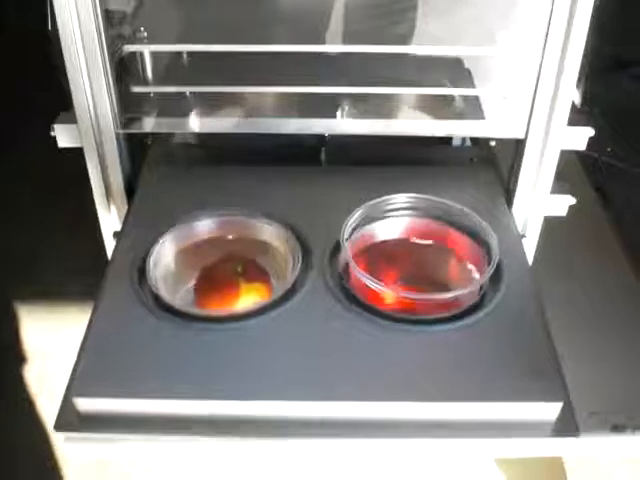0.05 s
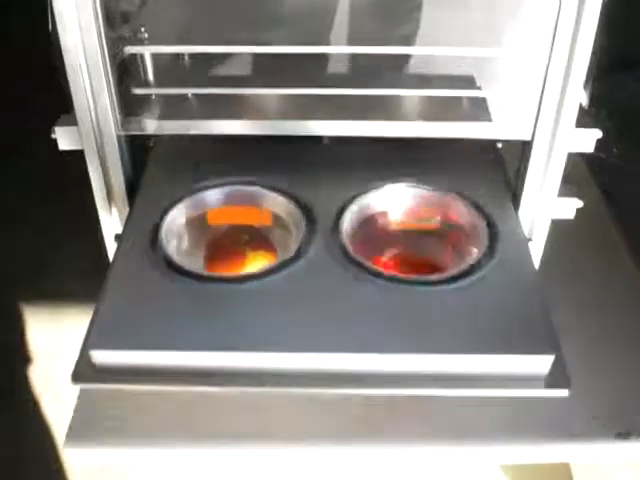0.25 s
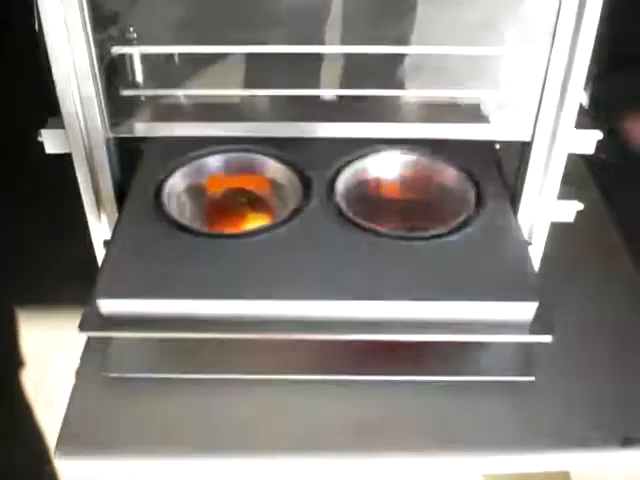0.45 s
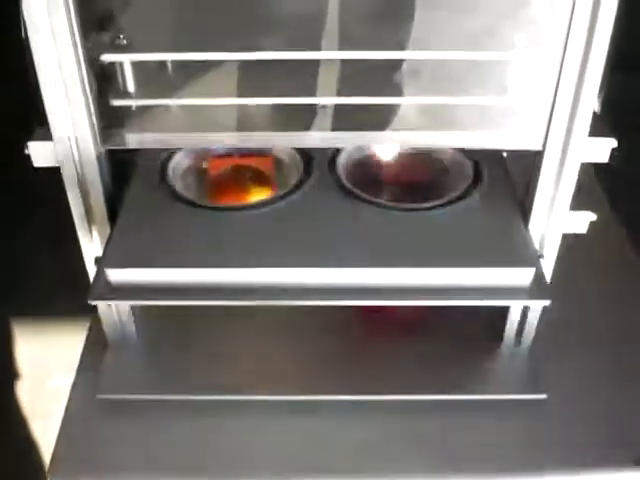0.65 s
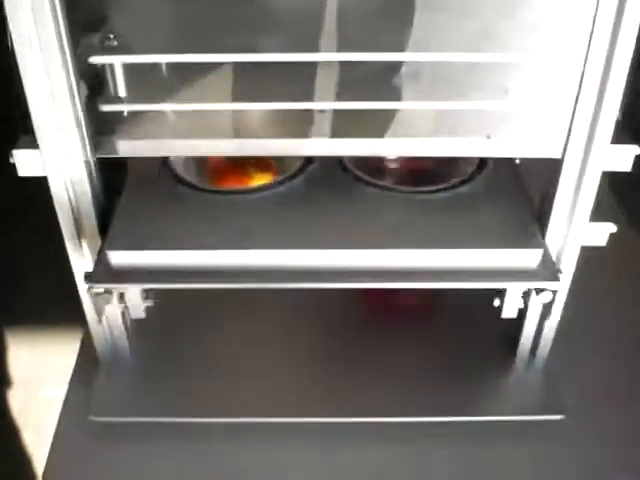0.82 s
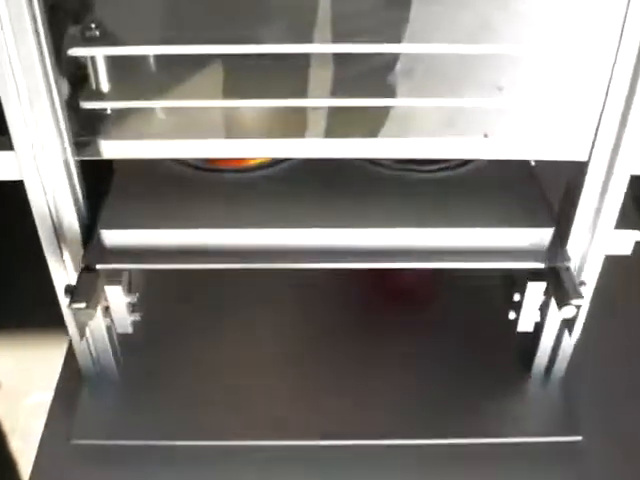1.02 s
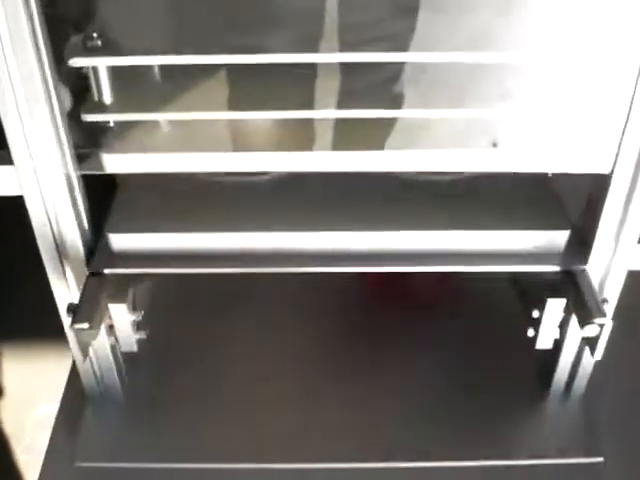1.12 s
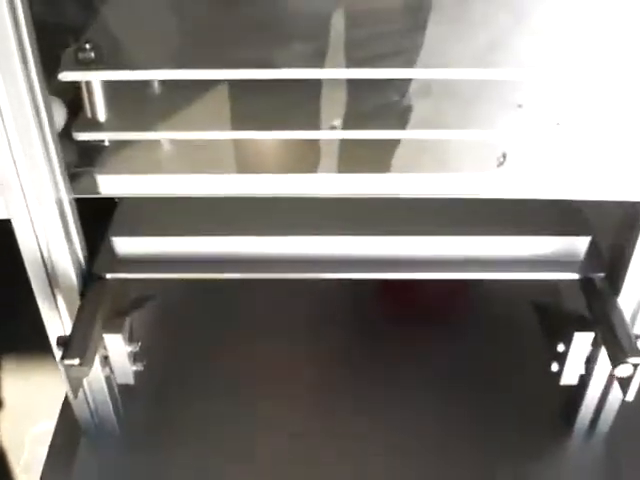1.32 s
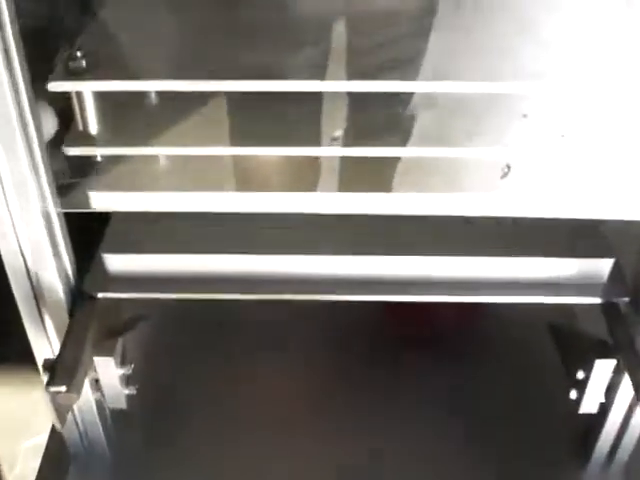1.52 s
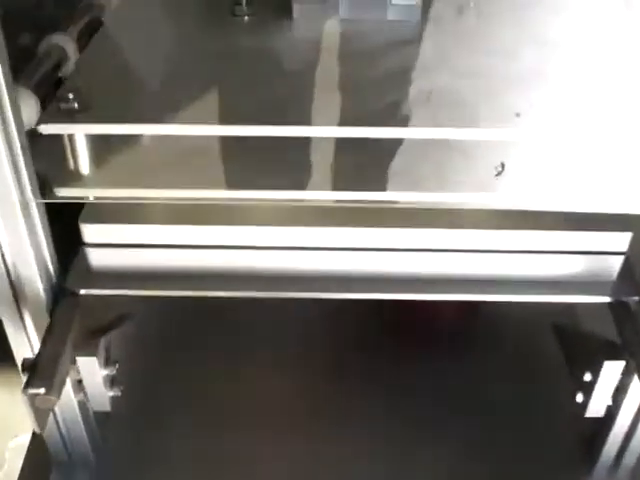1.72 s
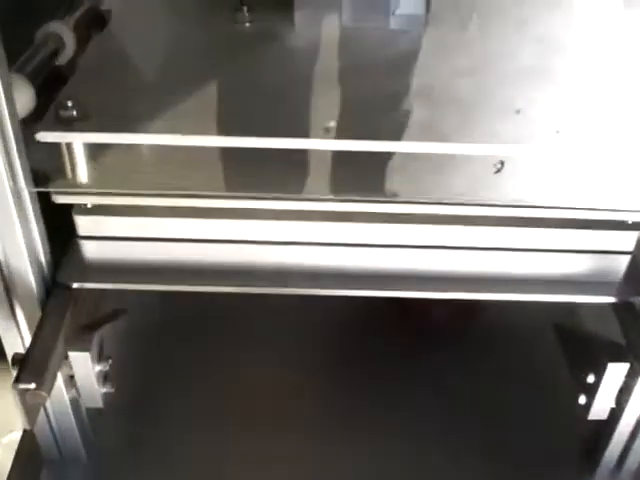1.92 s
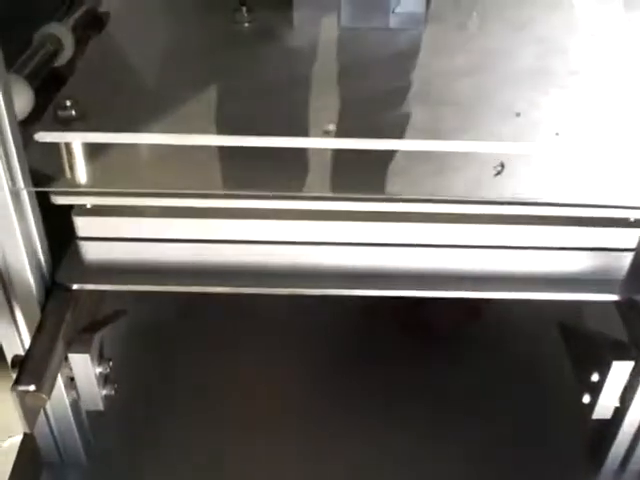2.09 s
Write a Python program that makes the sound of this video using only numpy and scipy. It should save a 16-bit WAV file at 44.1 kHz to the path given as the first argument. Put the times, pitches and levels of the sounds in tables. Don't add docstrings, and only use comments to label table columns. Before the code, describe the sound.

A pneumatic cup sealing machine, close, in a small workshop with faint hum. Near silence until 0.2 s, when a metal tray clatters sharply until 0.35, then rolls in, rumbling and squeaking, slowing by 1.0. A faint airy whistle and leak grow. At 1.35-1.45 switch clicks, a hard snap and a low thump. At 1.55 a bright air burst hisses, drops with small knocks at 1.75, dulls and fades by 2.1.

```python
import sys
import numpy as np
from scipy import signal
from scipy.fft import rfft, irfft, next_fast_len
from scipy.io import wavfile

SR = 44100
rng = np.random.default_rng(int(sys.argv[2]) if len(sys.argv) > 2 else 0)


def volts_from_decibels(level):
    exponent = np.asarray(level, float) / 20
    return 10 ** exponent


def transcribe(signal):
    frames = np.atleast_2d(signal).T
    limited = np.clip(frames, -1, 1)
    pcm = np.round(limited * 32767).astype(np.int16)
    wavfile.write(sys.argv[1], SR, pcm)


N = 94815

# frequency [Hz], level [dB per Hz].
FLOOR_COLOUR = [(50, -26), (80, -0.5), (140, 3), (217, -5), (600, -9), (1540, -28), (3180, -22),
                (12000, -32)]
FLOOR_DB, HUM_HZ, HUM_WIDTH_HZ, HUM_DB = -46, 166, 154, -45.5

# start [s], length
# [s], level [dB], first pitch [Hz], last pitch [Hz].
SQUEAKS = [(0.17, 0.32, -38, 172, 172), (.19, .07, -38, 520, 650), (0.52, 0.07, -46, 2450, 2520),
           (.21, 0.026, -39, 3900, 4000), (0.238, 0.009, -43, 4000, 4000), (0.43, 0.042, -39.5, 3280, 3040),
           (0.425, 0.065, -48, 4800, 5000), (0.44, .08, -42, 2560, 2440), (0.49, 0.03, -51, 5300, 5400),
           (.54, .05, -53, 6700, 6400), (.465, .025, -46, 1550, 1550), (0.41, 0.1, -40, 620, 600),
           (0.66, 0.31, -50, 2500, 2400), (0.66, 0.36, -46, 600, 540), (1.396, 0.2, -45, 1150, 1120),
           (1.47, .08, -35, 165, 163), (1.495, .02, -46, 2000, 2100), (1.48, .055, -49, 3100, 2900),
           (1.49, .03, -52, 3700, 3700), (1.775, .055, -40, 540, 550), (1.787, 0.08, -48, 1180, 1100),
           (1.873, .05, -43, 1230, 1200), (1.925, .065, -45, 1060, 1100), (2.0, .035, -51, 1150, 1150),
           (1.86, .065, -41, 170, 165), (.405, .025, -36, 190, 200)]
SQUEAK_SHARPNESS, SQUEAK_STEADY = 32, .9

# time [s], level [dB].
ROLL_LEVEL = [
    (.195, -38),
    (.25, -35),
    (.36, -41),
    (.45, -34),
    (.53, -39.5),
    (.7, -44.5),
    (.85, -48.5),
    (1.0, -55.5),
    (1.39, -55),
]
# frequency [Hz], level [dB per Hz].
ROLL_COLOUR = [(250, -7), (590, 1), (900, -5), (2490, -11.5), (3740, -18.5), (5090, -20), (8000, -31),
               (12000, -32)]
GRAINS_PER_S, GRAIN_SHARE = 1200, 0.78

# time [s], level [dB].
JOLTS = [(.1960, -37), (.2120, -28), (.2190, -33), (.2290, -29), (.2590, -23.5), (.2640, -12), (.2680, -7),
         (.2738, -4.5), (.2770, -12), (.2878, -17), (.2918, -9.5), (.2965, -10.5), (.2995, -14.5),
         (.3050, -32), (.3140, -17), (.3200, -18.5), (.3270, -32), (.3340, -40), (.3450, -26.5)]
# frequency [Hz], level [dB], 60 dB decay [s].
TRAY_MODES = [(526, -0.5, 0.054), (644, -5.5, 0.042), (720, -5.5, 0.1), (1016, -8.5, 0.053),
              (1205, -4, 0.035), (1406, -8, 0.059), (1587, -9.5, 0.026), (1920, -3, 0.024),
              (2166, -1, 0.019), (2600, -32, 0.022), (3240, -6, 0.011)]
# frequency [Hz], level [dB per Hz].
TRAY_CRACK = [(250, -10), (600, 0), (2200, -9), (4000, -14.5), (7500, -22), (12000, -29)]
TRAY_DB, TRAY_CRACK_DB, TRAY_CRACK_T60_S = -13.5, -4, 0.022
CRACK_RISE_S = 0.00066

# time [s], level [dB].
TICKS = [(.2185, -38.5), (.449, -42), (.5524, -46), (1.1161, -41.5), (1.148, -40.5), (1.177, -49),
         (1.425, -31), (1.439, -37), (1.497, -50), (1.512, -46), (1.5488, -20.5), (1.5555, -20),
         (1.7385, -31), (1.754, -32.5), (1.766, -34.5), (1.875, -32), (1.884, -50), (2.046, -50),
         (2.062, -44)]
# frequency [Hz], level [dB per Hz].
TICK_CRACK = [(900, -10), (1300, -1.5), (2100, 4), (3200, -3.5), (5000, -11.5), (7000, -17.5), (11000, -12)]
TICK_T60_S = 0.043

# time [s], level [dB], pitch [Hz], 60 dB decay [s].
KNOCKS = [(0.219, -27.5, 3950, 0.037), (.45, -35.5, 2030, 0.064), (.553, -40, 2550, 0.029),
          (.688, -35, 181, 0.11), (.955, -35, 1000, 0.036), (1.086, -38, 1020, 0.032),
          (1.121, -39, 1548, 0.028), (1.176, -38, 1020, 0.04), (1.388, -26, 2860, 0.03),
          (1.3935, -15, 2900, 0.035), (1.398, -23, 3170, 0.11), (1.401, -28, 555, .1),
          (1.456, -26, 164, 0.6), (1.554, -19.5, 492, 0.027), (1.735, -32, 950, 0.025),
          (1.739, -31, 820, 0.03), (1.744, -29, 690, 0.045), (1.752, -31, 1142, 0.038),
          (1.757, -33, 620, .04), (1.757, -34, 400, .04), (1.736, -34.5, 174, 0.11),
          (1.768, -30, 160, 0.14), (1.785, -30.5, 183, .12), (1.803, -34.5, 166.5, 0.074),
          (1.783, -32.5, 524, 0.14), (1.874, -39, 1205, 0.12), (1.932, -38.5, 1030, 0.072),
          (1.963, -39.5, 957, 0.07), (2.046, -38, 573, 0.056), (2.062, -41, 696, 0.058)]
KNOCK_PUFF_DB, KNOCK_SPREAD, KNOCK_RISE_S = -0.5, 0.23, 0.0012

# frequency [Hz], width [Hz], level [dB].
WHISTLE_TONES = [(2075, 170, -4.5), (2336, 530, -13), (3860, 170, -19.5), (7000, 400, -24)]
# time [s], level [dB].
WHISTLE_LEVEL = [
    (.55, -57),
    (.85, -48),
    (1.05, -44),
    (1.385, -42.5),
    (1.40, -43),
    (1.56, -77),
]
WHISTLE_FLUTTER_DB, WHISTLE_FLUTTER_PER_S = 1.5, 30

# frequency [Hz], level [dB per Hz].
LEAK_COLOUR = [(3000, -5.5), (6840, -7.5), (8090, -10), (12000, -12)]
LEAK_S, LEAK_DB, LEAK_HOLD_S, LEAK_T60_S = .705, -49, 0.084, 0.74

# time [s], level [dB].
SNAPS = [(1.3440, -20.5), (1.3640, -24.5), (1.3935, -8), (1.408, -25), (1.425, -42), (1.445, -35),
         (1.497, -35.5), (1.5485, -11), (1.556, -17), (1.877, -18), (1.965, -18.5)]
# frequency [Hz], level [dB], 60 dB decay [s].
VALVE_MODES = [(3900, -12, .015), (5255, -9, .02), (6130, -9, .022), (7477, -12, .015), (8540, -12, .018),
               (10530, -9, .012), (11400, -9, .012)]
# frequency [Hz], level [dB per Hz].
VALVE_CRACK = [(2300, -9), (3000, -10), (4100, -13.5), (6000, -8), (8000, -8), (12000, -8)]
VALVE_DB, VALVE_CRACK_DB, VALVE_CRACK_T60_S = -10, -12, 0.08

# time [s], level [dB].
THUMPS = [
    (1.406, -30),
    (1.411, -29),
    (1.422, -32.5),
    (1.434, -33.5),
    (1.446, -35),
]
# frequency [Hz], level [dB], 60 dB decay [s].
FRAME_MODES = [(84.7, -1, 0.16), (138, -1, 0.062), (164, -12, 0.9), (552, -7, 0.1)]
# frequency [Hz], level [dB per Hz].
PANEL_THUD = [(120, 6.5), (300, -1), (600, -5.5), (1400, -14.5), (2500, -26)]
THUD_DB, THUD_T60_S = -6.5, 0.29

# time [s], level [dB].
VENT_LEVEL = [
    (1.536, -45.5),
    (1.548, -30),
    (1.556, -17.5),
    (1.6, -21.5),
    (1.74, -22.5),
    (1.8, -34),
    (1.86, -33.5),
    (1.97, -32.5),
    (2.11, -56.5),
]
# frequency [Hz], level [dB per Hz].
VENT_FULL = [(700, -17), (1300, -8), (1800, -33), (2100, -7.5), (4190, -5), (6180, 0.5), (12000, 1)]
# frequency [Hz], level [dB per Hz].
VENT_WEAK = [(1000, -4.5), (1980, -13.5), (2730, -4), (5340, -1.5), (12000, -4)]
# frequency [Hz], level [dB per Hz].
VENT_DYING = [(1000, 2), (1900, -3), (2730, -5), (5000, 1.5), (7000, -11), (12000, -23)]
# frequency [Hz], width [Hz], level [dB].
MUFFLER = [(4580, 110, 1), (5200, 120, -3), (5940, 70, -3), (7050, 100, 1), (9240, 90, 2), (9800, 80, 1),
           (10300, 70, 1), (10640, 100, 3), (11700, 70, 2)]
MUFFLER_DB, AIR_PATCHY_DB = -18, .8
VENT_CLOSES_S, VENT_CLOSING_S = 1.75, 0.014
VENT_DULLS_S, VENT_DULLING_S = 2.002, 0.1

SHARED_FLICKER = .5
ROOM_T60_S, ROOM_DB, WALL_CUT_HZ = 0.46, -24, 5300
START_S, FADE_S, FADE_DB_PER_S = .1955, 2.066, -84
OVERLOAD, BASS_CUT_HZ, DIP_HZ, TREBLE_CUT_HZ = .9, 59.4, 8000, 12050


def rms_one(x):
    return x / np.sqrt(np.mean(x ** 2) + 1e-20)


def clock():
    return np.arange(N) / SR


def level(rows):
    s, db = np.transpose(rows)
    return volts_from_decibels(np.interp(clock(), s, db)) * (clock() >= s[0])


def ramp(start_s, length_s):
    return np.clip((clock() - start_s) / length_s, 0, 1)


def high_pass(x, order, hz):
    return signal.sosfilt(signal.butter(order, hz, "high", fs=SR, output="sos"), x)


def drift(rate):
    r = np.exp(-80 * np.pi * rate / SR)
    white = rng.standard_normal(N // 40 + 2002)
    slow = signal.lfilter([1], [1, -2 * r, r * r], white)[2000:]
    return np.interp(np.arange(N) / 40, np.arange(len(slow)), rms_one(slow - slow.mean()))


def coloured(spectrum, patchy_db, source=None):
    hz, db = np.transpose(spectrum)
    white = rng.standard_normal((2, N)) if source is None else [source, -source]
    edges = 28 * 2 ** np.arange(0, 9.1, 1 / 3)
    together, out = drift(4.0), 0
    for k, (low, high) in enumerate(zip(edges, edges[1:])):
        centre = np.sqrt(low * high)
        if .8 * hz[0] < centre < 1.15 * hz[-1]:
            band = signal.sosfilt(signal.butter(2, [low, high], "band", fs=SR, output="sos"), white[k % 2])
            flicker_db = patchy_db * (SHARED_FLICKER * together + drift(14))
            out = out + volts_from_decibels(np.interp(np.log(centre), np.log(hz), db) + flicker_db) * band
    return rms_one(out)


def narrow(hz, width_hz):
    r = np.exp(-np.pi * width_hz / SR)
    poles = [1, -2 * r * np.cos(2 * np.pi * hz / SR), r * r]
    once = signal.lfilter([1], poles, rng.standard_normal(N))
    return rms_one(signal.lfilter([1, 0, -1], poles, once))


def struck(events, modes, chatter_s, spread_db=4.5, count=4):
    draw = rng.random((len(events), count)) * (np.arange(count) > 0)
    s, db = np.transpose(events)[:2, :, None]
    at = ((s + draw * chatter_s) * SR).astype(int).ravel()
    touch_db = (db - 6 * draw).ravel()
    out = np.zeros(N)
    for hz, mode_db, t60 in modes:
        clicks = np.full(N, 1e-18)
        strength_db = touch_db + mode_db + spread_db * rng.standard_normal(len(at))
        np.add.at(clicks, at, volts_from_decibels(strength_db))
        r, w = volts_from_decibels(-60 / (t60 * SR)), 2 * np.pi * hz / SR
        out += signal.lfilter([0, np.sin(w)], [1, -2 * r * np.cos(w), r * r], clicks)
    return out


def crack(events, spectrum, t60):
    s, db = np.transpose(events)
    kicks = np.zeros(N)
    np.add.at(kicks, (s * SR).astype(int), volts_from_decibels(db))
    rise = np.exp(-1 / (CRACK_RISE_S * SR))
    poles = np.convolve([1, -volts_from_decibels(-60 / (t60 * SR))], [1, -rise])
    return signal.lfilter([1 - rise], poles, kicks) * coloured(spectrum, patchy_db=0.5)


def workshop_floor():
    noise = volts_from_decibels(FLOOR_DB) * coloured(FLOOR_COLOUR, patchy_db=-1.0)
    return noise + volts_from_decibels(HUM_DB) * narrow(HUM_HZ, HUM_WIDTH_HZ)


def squeak(s, length, db, first_hz, last_hz):
    done = np.linspace(0, 1, int(length * SR))
    r = np.exp(-np.pi * max(first_hz / SQUEAK_SHARPNESS, 60) / SR)
    wobble = rms_one(signal.lfilter([1], [1, -r], rng.standard_normal((2, len(done)))))
    carrier = np.exp(2j * np.pi * np.cumsum(first_hz + (last_hz - first_hz) * done) / SR)
    tone = (carrier * (SQUEAK_STEADY + wobble[0] + 1j * wobble[1])).real
    swell = np.abs(np.sin(np.pi * done)) ** .5
    out, start = np.zeros(N), int(s * SR)
    out[start:start + len(done)] = volts_from_decibels(db) * swell * rms_one(tone)
    return out


def rolling():
    hit = rng.random(N) < GRAINS_PER_S / SR
    size_db = 1.5 * np.minimum(rng.exponential(1, N), 5)
    grit = hit * volts_from_decibels(size_db) * rng.choice([-1, 1], N)
    source = rng.standard_normal(N) + GRAIN_SHARE * rms_one(grit)
    stop = np.clip((ROLL_LEVEL[-1][0] + 0.15 - clock()) / 0.059, 0, 1)
    return level(ROLL_LEVEL) * stop * volts_from_decibels(1.0) * coloured(ROLL_COLOUR, patchy_db=2.0, source=source)


def tray_rattle():
    ring = volts_from_decibels(TRAY_DB) * struck(JOLTS, TRAY_MODES, 0.003836)
    noise = volts_from_decibels(TRAY_CRACK_DB) * crack(JOLTS, TRAY_CRACK, TRAY_CRACK_T60_S)
    return high_pass(ring + noise, 2, 200)


def knock(s, db, hz, t60):
    since = np.maximum(clock() - s, 0)
    rise = np.minimum(since / KNOCK_RISE_S, 1)
    puff = volts_from_decibels(db + KNOCK_PUFF_DB - 60 * since / min(t60, .06)) * rise * narrow(hz, KNOCK_SPREAD * hz)
    chatter_s = 4 / hz * (hz > 300)
    return puff + struck([(s, db)], [(hz, -9, t60)], chatter_s, spread_db=2.0)


def seal_whistle():
    whistle = sum(volts_from_decibels(db) * narrow(hz, width_hz) for hz, width_hz, db in WHISTLE_TONES)
    flutter = volts_from_decibels(WHISTLE_FLUTTER_DB * drift(WHISTLE_FLUTTER_PER_S))
    return level(WHISTLE_LEVEL) * flutter * whistle


def air_leak():
    since = clock() - LEAK_S
    fall_db = 60 * np.maximum(since - LEAK_HOLD_S, 0) / LEAK_T60_S
    return volts_from_decibels(LEAK_DB - fall_db) * ramp(LEAK_S, 0.0051) * coloured(LEAK_COLOUR, patchy_db=0.5)


def valve_snaps():
    ring = volts_from_decibels(VALVE_DB) * struck(SNAPS, VALVE_MODES, 0.00293)
    noise = volts_from_decibels(VALVE_CRACK_DB) * crack(SNAPS, VALVE_CRACK, VALVE_CRACK_T60_S)
    return high_pass(ring + noise, 3, 2200)


def frame_thumps():
    ring = struck(THUMPS, FRAME_MODES, 0.00074, spread_db=1.0, count=2)
    return ring + volts_from_decibels(THUD_DB) * crack(THUMPS, PANEL_THUD, THUD_T60_S)


def vent_punch():
    return struck([(1.5525, -10)], [(160, 0, .035)], chatter_s=0, spread_db=0, count=1)


def vent():
    muffler = sum(volts_from_decibels(MUFFLER_DB + db) * narrow(hz, width_hz) for hz, width_hz, db in MUFFLER)
    full = rms_one(coloured(VENT_FULL, AIR_PATCHY_DB) + muffler)
    dull = ramp(VENT_DULLS_S, VENT_DULLING_S)
    weak = np.sqrt(1 - dull) * coloured(VENT_WEAK, AIR_PATCHY_DB)
    weak = weak + np.sqrt(dull) * coloured(VENT_DYING, AIR_PATCHY_DB)
    shut = ramp(VENT_CLOSES_S, VENT_CLOSING_S)
    return level(VENT_LEVEL) * (np.sqrt(1 - shut) * full + np.sqrt(shut) * volts_from_decibels(0.56) * weak)


def room(x):
    size = next_fast_len(N + SR)
    turn = np.exp(-2j * np.pi * np.arange(size // 2 + 1) / size)
    dull = np.exp(-2 * np.pi * WALL_CUT_HZ / SR)
    wall = (1 - dull) / (1 - dull * turn)
    response = 0
    for k, lag in enumerate((rng.uniform(.01, .035, size=10) * SR).astype(int)):
        loop = volts_from_decibels(-60 * lag / SR / ROOM_T60_S) * turn ** lag * wall
        response = response + (-1) ** k * loop / (1 - loop)
    return irfft(rfft(x, size) * response, size)[:N]


def scene():
    rails = rolling() + sum(squeak(*row) for row in SQUEAKS) + seal_whistle()
    hits = tray_rattle() + crack(TICKS, TICK_CRACK, TICK_T60_S) + sum(knock(*row) for row in KNOCKS)
    hits = hits + valve_snaps() + frame_thumps()
    air = air_leak() + vent_punch() + vent()
    return (workshop_floor() + rails + hits + volts_from_decibels(ROOM_DB) * room(hits) + air)[None]


def top_cut(x):
    return signal.sosfilt(signal.butter(12, 13340, fs=SR, output="sos"), x)


def record(dry):
    x = OVERLOAD * np.tanh(dry / OVERLOAD)
    fade = volts_from_decibels(FADE_DB_PER_S * np.maximum(clock() - FADE_S, 0))
    x = x * fade * (clock() >= START_S)
    x = high_pass(x, 4, BASS_CUT_HZ)
    x = signal.lfilter(*signal.iirnotch(DIP_HZ, 40, SR), x)
    x = signal.sosfilt(signal.ellip(14, .5, 70, TREBLE_CUT_HZ, fs=SR, output="sos"), x)
    return top_cut(x)


dry = scene()
out = record(dry)
transcribe(out)
```